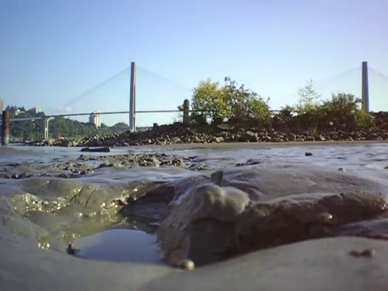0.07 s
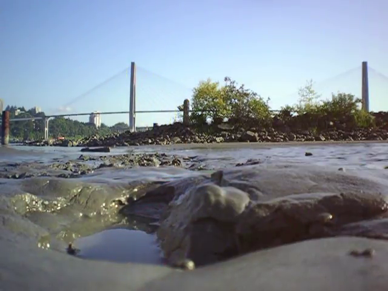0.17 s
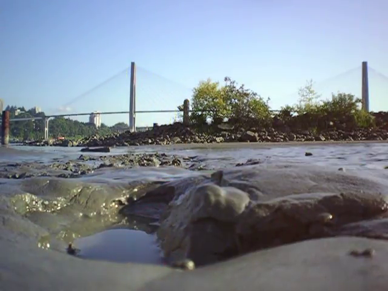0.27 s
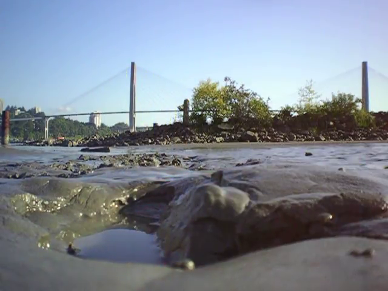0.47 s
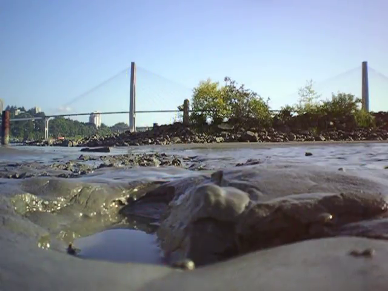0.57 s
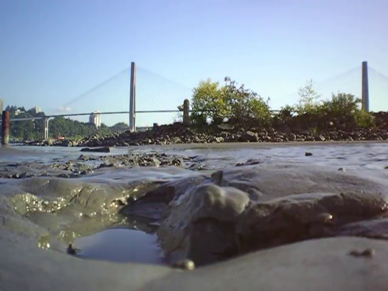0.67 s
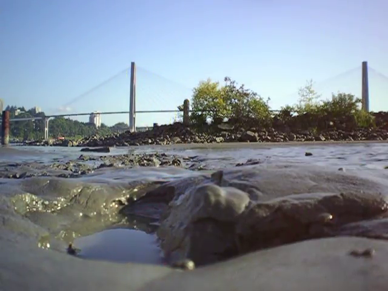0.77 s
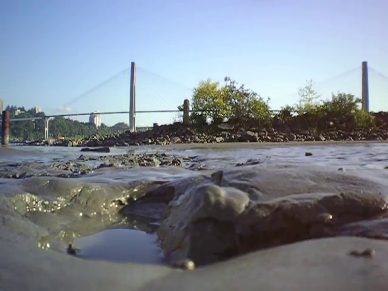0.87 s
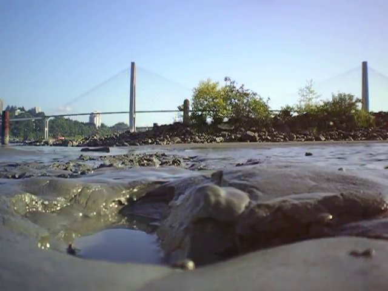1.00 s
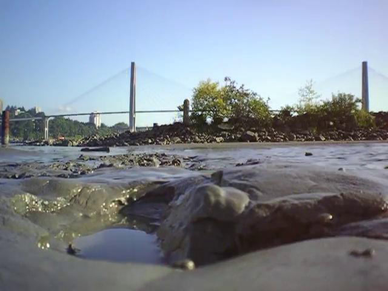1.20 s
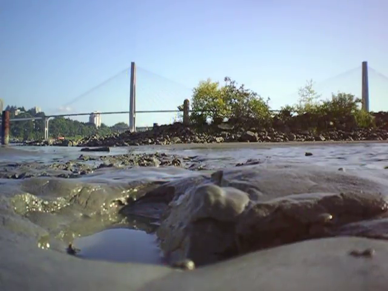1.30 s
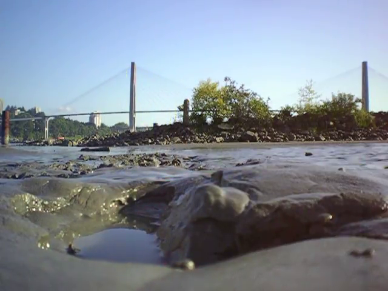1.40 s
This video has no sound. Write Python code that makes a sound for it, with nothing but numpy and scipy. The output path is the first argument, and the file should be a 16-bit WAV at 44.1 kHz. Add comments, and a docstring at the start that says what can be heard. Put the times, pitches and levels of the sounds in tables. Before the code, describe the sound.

Wet mud pops close to the microphone on an outdoor mudflat: a fat plop, a thin crackle, then a smaller plop and two faint ticks. A steady airy rush, faint fizz and low hum lie behind.

```python
"""Mud popping on a tidal flat

Wet mud pops three times close by: a fat plop, a thin crackle and a smaller plop; two faint ticks follow.
Each pop is a quick cluster of gas pockets that open and ring, inside a short wet squelch. Behind them
are a steady airy rush, the faint fizz of bubbles in the draining mud and a low hum, perhaps a far engine."""
import sys
import numpy as np
from scipy import signal
from scipy.fft import rfft, irfft
from scipy.io import wavfile

SR = 44100
rng = np.random.default_rng(int(sys.argv[2]) if len(sys.argv) > 2 else 0)


def pcm_store(signal):
    """Save signal as 16-bit PCM."""
    levels = np.round(np.clip(np.atleast_2d(signal), -1, 1) * 32767)
    wavfile.write(sys.argv[1], SR, levels.astype(np.int16).T)


N = 63945
TIME = np.arange(N) / SR
BAND_LIMIT_HZ = 4750

# slow rise and fall shared by the rush and the fizz: t/s, level/dB
BACKGROUND_LEVEL = [(0, -34), (.5, -36), (.95, -34.5), (1.17, -34), (1.35, -32.5), (1.45, -33.5)]


def from_db(db):
    """Amplitude ratio of a level in decibels."""
    return 10 ** (np.asarray(db) / 20)


def unit_rms(x):
    """Normalisation to an rms of one."""
    return x / np.sqrt(np.mean(x ** 2) + 1e-20)


def envelope(rows):
    """Gain over time, interpolated between rows of t/s, level/dB."""
    return from_db(np.interp(TIME, *np.transpose(rows)))


def drift(corner_hz):
    """Slow random motion of unit rms: white noise through a two-pole low-pass."""
    step, settle = 40, 2000   # samples per step; steps for the filter to settle
    pole = np.exp(-2 * np.pi * corner_hz * step / SR)
    white = rng.standard_normal(N // step + settle + 2)
    slow = signal.lfilter([1], [1, -2 * pole, pole ** 2], white)[settle:]
    return np.interp(np.arange(N) / step, np.arange(len(slow)), unit_rms(slow))


def coloured_noise(spectrum):
    """Spectral shaping of white noise by rows of f/Hz, level/dB; band-limited, unit rms."""
    hz, db = np.transpose(spectrum)
    bins = np.maximum(np.fft.rfftfreq(N, 1 / SR), 1)
    gain = from_db(np.interp(np.log(bins), np.log(hz), db)) * (bins < BAND_LIMIT_HZ)
    return unit_rms(irfft(rfft(rng.standard_normal(N)) * gain, N))


def airy_rush():
    """Broadband noise: a continuous spectrum is heard as a rush without pitch."""
    # spectral density of the rush: f/Hz, relative level/dB
    spectrum = [(25, -21), (45, -10), (65, -7), (100, 0), (135, 2), (190, 1), (400, -1.5), (650, -1),
                (950, 0.5), (1280, -3), (1650, -12.5), (2200, -13.5), (3200, -11), (3700, -15.5),
                (4400, -10)]
    return envelope(BACKGROUND_LEVEL) * coloured_noise(spectrum)


def fizz(bubbles_per_s=750, ring_cycles=46, relative_db=-16.5):
    """Bubble resonance: tiny bubbles in the draining mud ring at random times, each a damped sine."""
    strengths = from_db(2.5 * np.minimum(rng.exponential(1, N), 4)) * rng.choice([-1, 1], N)
    impulses = strengths * (rng.random(N) < bubbles_per_s / SR)
    pitches_hz = np.geomspace(2300, 3700, 10)
    pitch_index = rng.integers(0, len(pitches_hz), N)
    out = np.zeros(N)
    for k, hz in enumerate(pitches_hz):
        r = 1000 ** (-hz / (ring_cycles * SR))   # 60 dB of decay in ring_cycles
        w = 2 * np.pi * hz / SR
        out += signal.lfilter([0, np.sin(w)], [1, -2 * r * np.cos(w), r * r],
                              impulses * (pitch_index == k) + 1e-18)
    return envelope(BACKGROUND_LEVEL) * from_db(relative_db) * unit_rms(out)


def hum():
    """Amplitude and phase modulation: a low tone fades and returns beside two weaker wavering ones."""
    # strength of the main tone: t/s, rms level/dB
    main_level = [(0, -43.5), (.15, -42), (.22, -59.5), (.38, -50), (.45, -40), (.66, -38.5), (.8, -45.5),
                  (.95, -50), (1.05, -41.5), (1.33, -44), (1.45, -52.5)]
    # weaker spectral lines: f/Hz, rms level/dB
    weak_lines = [(64, -54.5), (127, -48)]

    def tone(hz, waver_rad):
        return np.sqrt(2) * np.sin(2 * np.pi * hz * TIME + waver_rad * drift(corner_hz=2.4))
    main = envelope(main_level) * tone(hz=90.3, waver_rad=0.31)
    return main + sum(from_db(db) * tone(hz, waver_rad=1.7) for hz, db in weak_lines)


def gas_pockets(rise_per_s=4.1):
    """Damped cavity resonance: an opening pocket swells, rings slightly upward and is stilled by mud."""
    # pockets that open: onset t/s, f/Hz, peak level/dB, swell t/s
    openings = [ (.2084, 732, -8, 0.0019), (.2093, 2880, -15, 0.00077), (0.2103, 254, -18, 0.0033),
                (0.2144, 1043, -5.5, 0.0017), (0.2131, 1520, -12.5, .0012), (.2168, 653, -4, 0.0015),
                (0.219, 2460, -16, 0.0013), (.2198, 783, -7, 0.00072), (.2246, 707, -7, 0.0019),
                (.2258, 3600, -25.5, .0010), (.2300, 3500, -27.5, 0.0013), (.2335, 683, -26, 0.003),
                (0.8469, 3300, -15.5, 0.00023), (0.8535, 3400, -20, 0.00018), (0.8551, 1380, -16, 0.00025),
                (0.8736, 3530, -21.5, 0.0016), (0.8767, 2950, -16, 0.0008), (0.8779, 2610, -8, 0.00047),
                (0.8791, 1620, -12, 0.00062), (0.8925, 3350, -21.5, 0.00059), (.9335, 2780, -28.5, 0.00069),
                (1.0858, 3270, -12.5, 0.00057), (1.0868, 1133, -14.5, 0.00069), (1.0885, 736, -16.5, .0030),
                (1.0905, 470, -23, 0.00097), (1.0907, 3130, -20, 0.0018), (1.0980, 3460, -28, .0005),
                (1.3319, 3270, -21.5, 0.00027), (1.4070, 3200, -29, 0.00065)]
    out = np.zeros(N)
    for onset_s, hz, db, swell_s in openings:
        t = np.maximum(TIME - onset_s, 0)
        swell = t / swell_s * np.exp(1 - t / swell_s)
        phase = 2 * np.pi * hz * t * (1 + rise_per_s * t / 2)
        out += from_db(db) * swell * np.sin(phase)
    return out


def squelches():
    """Transient noise: the mud's wet skin tears and slaps shut in a brief rough swell around each pop."""
    # noise bursts: peak t/s, rms level/dB at the peak, swell t/s, fade t/s
    bursts = [(0.2199, -12, 0.0051, 0.0067), (0.8766, -19, 0.0038, 0.0043), (1.089, -20, 0.0038, 0.005)]
    # spectral density of each burst: f/Hz, relative level/dB
    spectra = [
        [(100, -22), (250, -15.5), (650, 0.5), (1150, -6.5), (2000, -15), (2800, -18.5), (3600, -17.5),
         (4400, -38)],
        [(100, -18), (1100, -15.5), (1600, -11.5), (2200, -18), (3000, 5), (3600, -14), (4400, 8)],
        [(100, -14), (450, -4), (630, -12), (850, 2.5), (1380, -1), (2000, -27.5), (2700, -5), (3300, -1.5),
         (4400, -1.5)],
    ]
    out = np.zeros(N)
    for (peak_s, db, swell_s, fade_s), spectrum in zip(bursts, spectra):
        from_peak = (TIME - peak_s) / np.where(TIME < peak_s, swell_s, fade_s)
        swell = np.exp(1 - np.hypot(1, from_peak))   # exponential flanks, rounded top
        out += from_db(db) * swell * coloured_noise(spectrum)
    return out


def scene():
    """Superposition in one channel: rush, fizz and hum behind, pops in front."""
    background = airy_rush() + fizz()
    pops = gas_pockets() + squelches()
    return (background + pops + hum())[None]


def record(dry, treble_edge_hz=3800, ceiling=0.77, knee=16, cutoff_hz=15800):
    """Band limiting and saturation: the treble is cut and the loudest peaks are rounded off."""
    x = signal.sosfilt(signal.butter(8, treble_edge_hz, fs=SR, output="sos"), dry)
    x = signal.sosfilt(signal.cheby2(12, 60, BAND_LIMIT_HZ, fs=SR, output="sos"), x)
    x = x / (1 + np.abs(x / ceiling) ** knee) ** (1 / knee)
    return signal.sosfilt(signal.cheby2(12, 70, cutoff_hz, fs=SR, output="sos"), x)


dry = scene()
out = record(dry)
pcm_store(out)
```